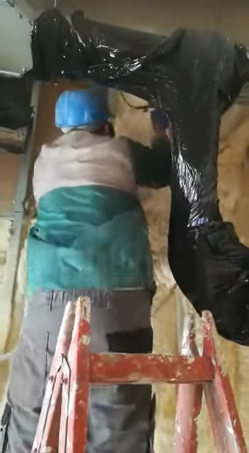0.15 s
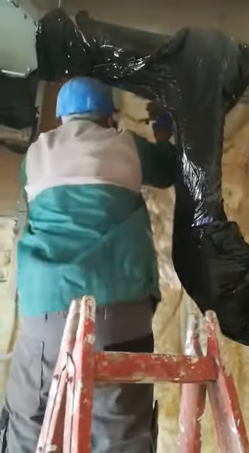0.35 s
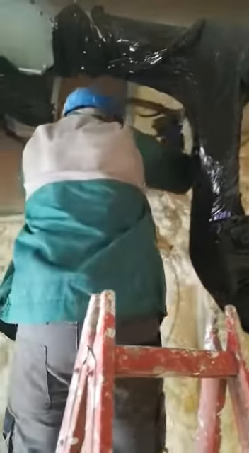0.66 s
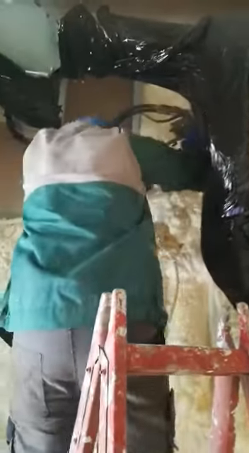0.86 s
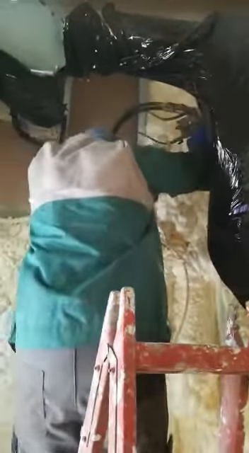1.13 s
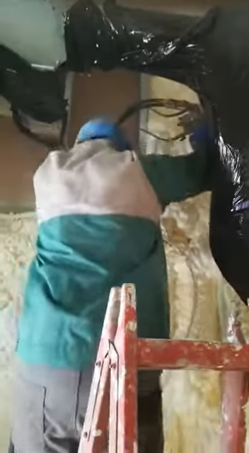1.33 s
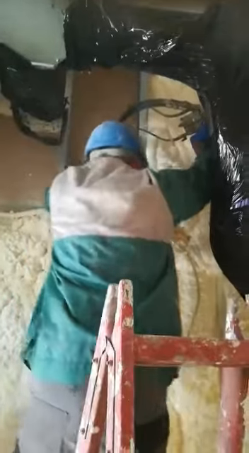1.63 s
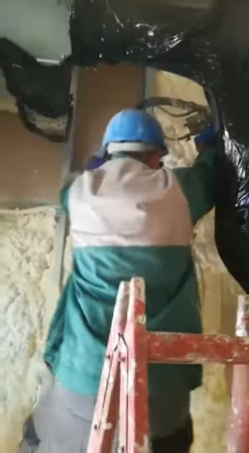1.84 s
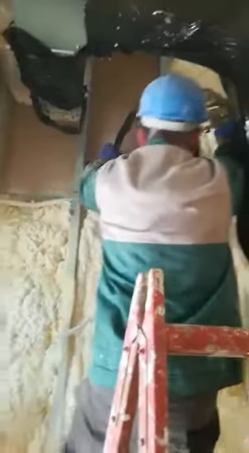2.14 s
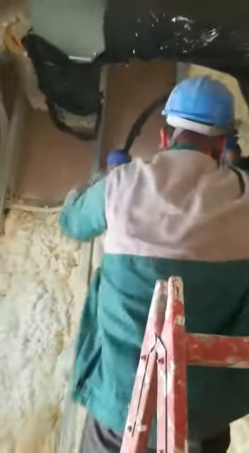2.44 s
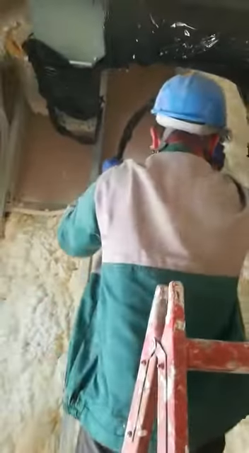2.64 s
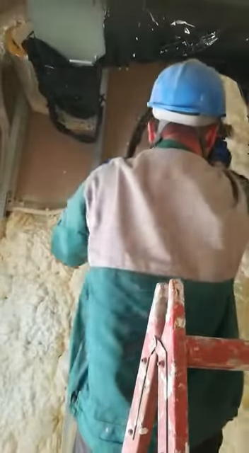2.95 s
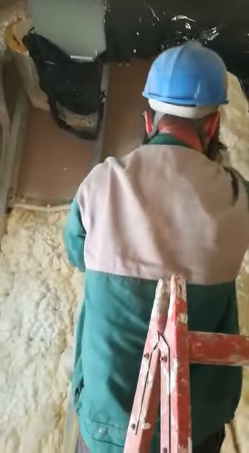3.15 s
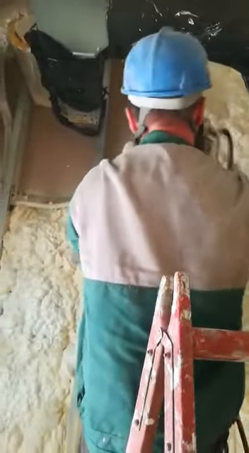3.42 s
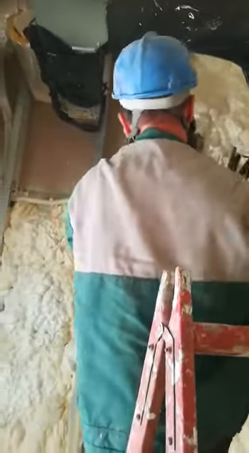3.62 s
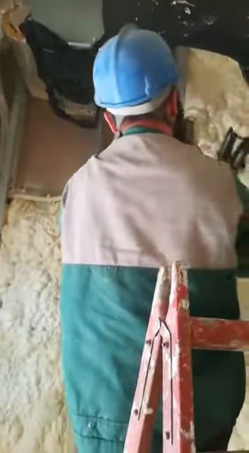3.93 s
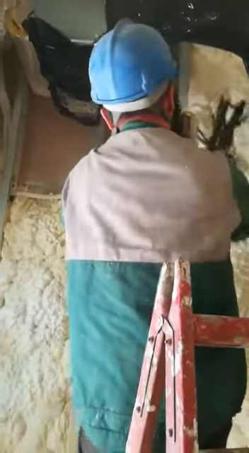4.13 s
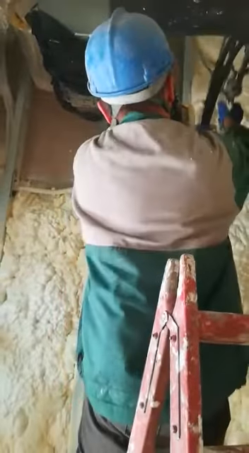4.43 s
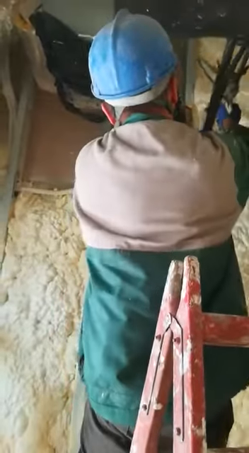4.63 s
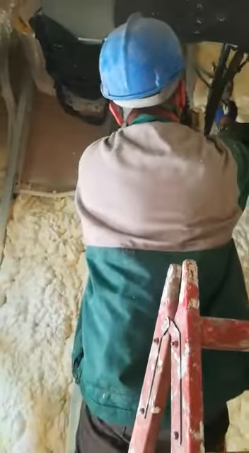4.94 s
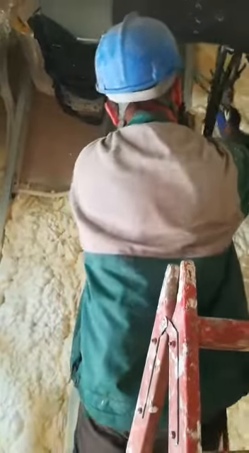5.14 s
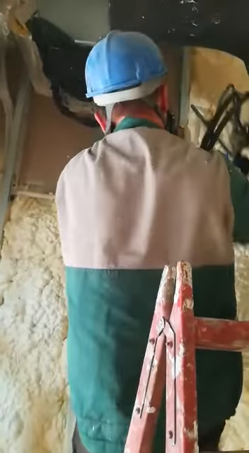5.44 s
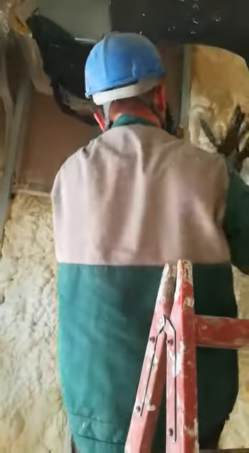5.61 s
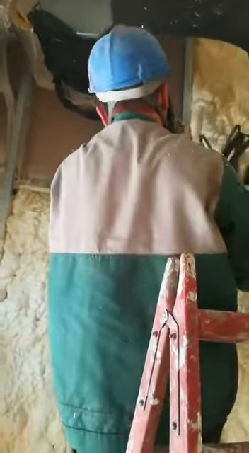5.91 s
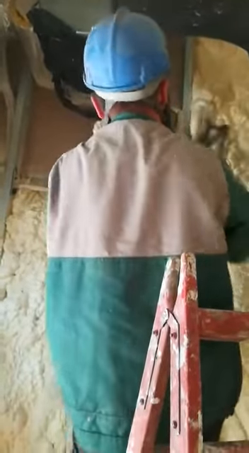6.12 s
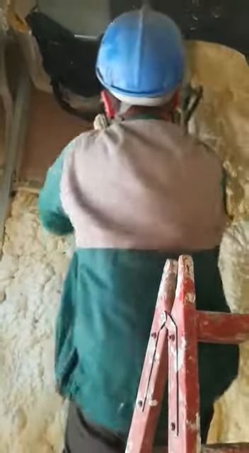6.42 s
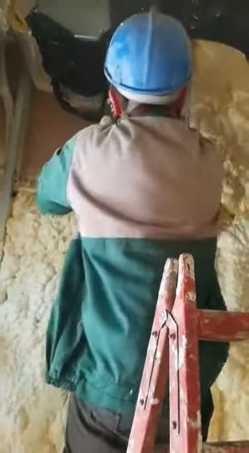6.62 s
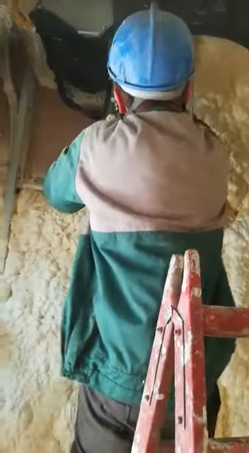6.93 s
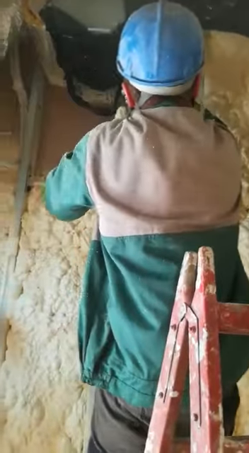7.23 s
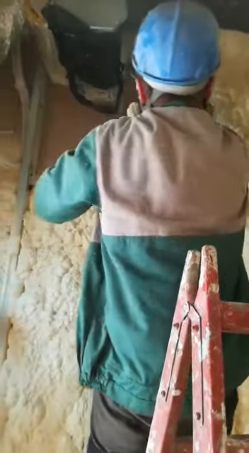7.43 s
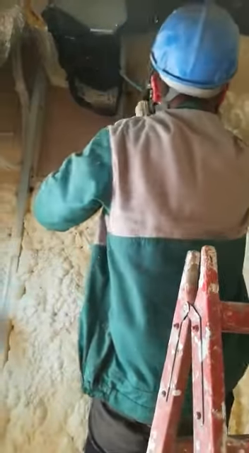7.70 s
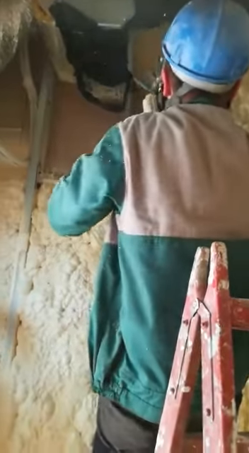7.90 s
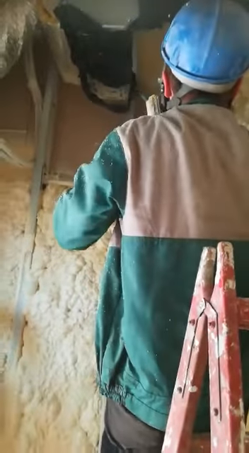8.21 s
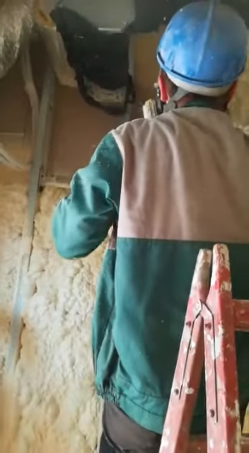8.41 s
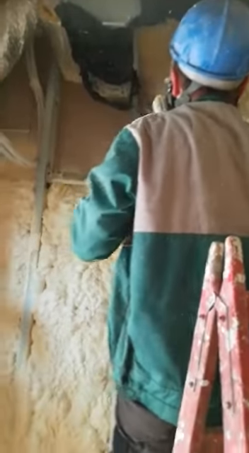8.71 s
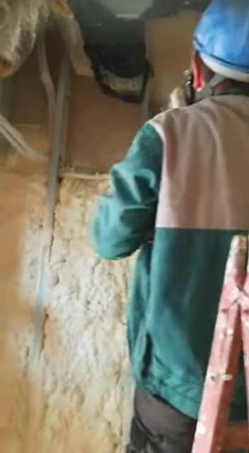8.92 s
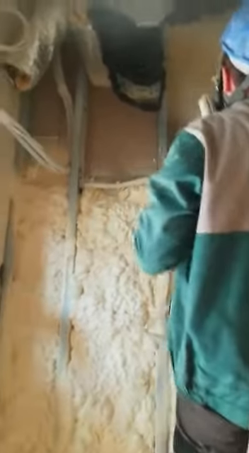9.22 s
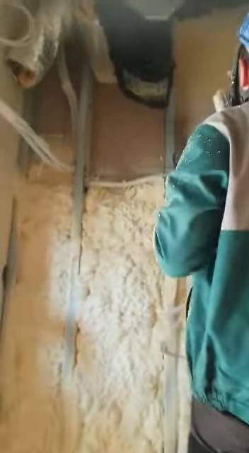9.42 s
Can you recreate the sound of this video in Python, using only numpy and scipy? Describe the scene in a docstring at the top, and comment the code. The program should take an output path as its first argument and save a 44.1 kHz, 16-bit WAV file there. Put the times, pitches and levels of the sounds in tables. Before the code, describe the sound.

Bright purge air hisses continuously from a nozzle. In the first seconds there are crackly hose scrapes, a short rubbery squeak, then scattered dull knocks and heavier boot scuffs. Then the spray bursts on, louder and breathier, roughest around six seconds, before settling into a long, slightly fluttering hiss. Low hum and rumble lie far beneath. Small padded space, phone microphones, treble stronger on the right.

```python
"""Spray foam gun in a padded attic

Purge air hisses from the nozzle as filtered noise; a trigger curve opens the stronger jet in bursts.
The spray roars into the wall cavity as resonant noise. Hose and boots scrape (tiny random slips), squeak
(gliding tones) and knock (decaying tones) over a soft rustle; a far pump hums below, with drone and rumble.
Two small microphones on a phone hear it, the left one turned away and dull in the treble."""
import sys
import numpy as np
from scipy import signal
from scipy.fft import rfft, irfft, next_fast_len
from scipy.io import wavfile

SR = 44100
rng = np.random.default_rng(int(sys.argv[2]) if len(sys.argv) > 2 else 0)


def pcm_store(signal):
    """Save signal as 16-bit PCM."""
    levels = np.round(np.clip(np.atleast_2d(signal), -1, 1) * 32767)
    wavfile.write(sys.argv[1], SR, levels.astype(np.int16).T)


def attenuation_scalar(level_db):
    """Turn a level in dB into a linear amplitude multiplier (20 dB per decade)."""
    decades = np.asarray(level_db, float) / 20
    return 10 ** decades


N = 421596   # length in samples
SIZE = next_fast_len(N)
HZ = np.maximum(np.arange(SIZE // 2 + 1) * SR / SIZE, 1)   # frequencies of a spectrum

# Ringing tones of the boards. Each row: frequency in Hz, relative strength in dB.
BOARD_TONES = [(120, -15), (195, -3), (245, -3), (325, -3.5), (455, -5.5), (560, -8)]
# The open jet as the gun sweeps. Each row: time in seconds, treble hiss in dB before tilt and surge,
# body of the hiss in dB against it before a fixed boost, upper and lower roar in dB before fixed cuts.
JET_SWEEP = [(4.5, -20.5, -12, -44, -53), (4.8, -23, -7.5, -46, -50.5), (5.05, -24, -9, -46, -54.5),
             (5.17, -23, -10, -43, -49.5), (5.23, -24.5, -13.5, -55, -61), (5.3, -26.5, -13.5, -57, -58),
             (5.36, -22.5, -8, -42.5, -53.5), (5.54, -22, -7, -45.5, -52), (5.8, -24.5, -5, -42.5, -42.5),
             (5.93, -24.5, -8, -42.5, -47), (6.03, -23, -5.5, -40, -43), (6.1, -26.5, -11, -54, -56),
             (6.2, -25.5, -16, -65, -63), (6.32, -23.5, -14, -61, -50.5), (6.5, -23.5, -13.5, -57, -62),
             (6.78, -22.5, -12.5, -51.5, -60), (6.97, -24.5, -11.5, -52.5, -57.5),
             (7.85, -23.5, -11, -51.5, -61.5), (8.3, -26.5, -9.5, -52, -60), (8.7, -26.5, -9, -51, -65),
             (8.9, -26, -8, -43.5, -57), (9.15, -25.5, -10, -48, -59.5), (9.56, -26.5, -8, -47, -62)]


def rms_one(x):
    """Scale to unit power."""
    return x / np.sqrt(np.mean(x ** 2) + 1e-20)


def in_time(rows):
    """Join the timed points of each column by straight lines, one value a sample."""
    s, *columns = np.transpose(rows)
    return [np.interp(np.arange(N) / SR, s, column) for column in columns]


def at_hz(points):
    """Read a frequency table at every frequency, on a logarithmic scale."""
    hz, values = np.transpose(points)
    return np.interp(np.log(HZ), np.log(hz), values)


def drift(rate):
    """Smooth random wandering of spread one; a higher rate in Hz wanders faster."""
    r = np.exp(-80 * np.pi * rate / SR)   # one step is 40 samples
    steps = rng.standard_normal(N // 40 + 2002)
    slow = signal.lfilter([1], [1, -2 * r, r * r], steps)[2000:]   # skip the settling
    return np.interp(np.arange(N) / 40, np.arange(len(slow)), rms_one(slow))


def resonance(x, hz, width):
    """Two-pole peak with gain one on top; width in Hz."""
    r = np.exp(-np.pi * width / SR)
    return signal.lfilter([(1 - r * r) / 2, 0, (r * r - 1) / 2],
                          [1, -2 * r * np.cos(2 * np.pi * hz / SR), r * r], x)


def ring(x, hz, width):
    """Pass through the same peak twice, for steeper sides."""
    return resonance(resonance(x, hz, width), hz, width)


def stroke(s, length, attack, t60):
    """Envelope: a straight rise, a hold until length has passed, then a decay of 60 dB in t60."""
    t = np.arange(N) / SR - s
    return np.clip(t / attack, 0, 1) * attenuation_scalar(-60 * np.clip(t - length, 0, None) / t60)


def at_ports(near, other):
    """Two spectra become left and right: sound off the walls is early on the left, straight sound late."""
    # Sound off the walls. Each row: frequency in Hz, likeness of left and right from 0 to 1.
    around = [(20, 1), (130, .98), (290, .78), (600, .4), (1200, .4), (1700, .2), (2300, .42), (3000, .12),
              (3500, .2), (4300, .05), (5000, .2), (6000, .05), (16000, 0)]
    # Sound straight from the gun. Each row: frequency in Hz, likeness from 0 to 1.
    straight = [(4000, 0.06), (6000, 0.17), (7000, 0.17), (8800, .3), (10500, .15), (16000, .08)]
    # The turned-away left microphone. Each row: frequency in Hz, left against right in dB.
    left_shade = [(60, -1.5), (330, -0.2), (650, 5), (1200, -1.5), (2700, 1.5), (4200, 0.5), (6000, -3),
                  (7300, -9), (8300, -15), (10000, -25), (13000, -19.5), (16000, -19.5)]
    lead_s, lag_s = 9.6 / 44100, 24 / 44100
    alike = at_hz(around) * np.exp(2j * np.pi * HZ * lead_s)
    alike = alike + at_hz(straight) * np.exp(-2j * np.pi * HZ * lag_s)
    left = alike * near + np.sqrt(np.clip(1 - abs(alike) ** 2, 0, 1)) * other
    shade = attenuation_scalar(at_hz(left_shade))
    # keep the average of the two ports at the level of the source
    middle = np.sqrt((1 + shade ** 2 + 2 * shade * alike.real) / 4)
    return np.array([shade * left, near]) / middle


def noise(spectrum):
    """Coloured noise at the two ports, as spectra."""
    return at_ports(*rfft(rng.standard_normal((2, SIZE)))) * attenuation_scalar(at_hz(spectrum))


def middle_rms(spectra, low_hz, high_hz):
    """Strength of the average of the two ports between two frequencies."""
    inside = (HZ > low_hz) & (HZ < high_hz)
    return np.sqrt(2 * np.sum(abs(spectra.mean(axis=0)[inside]) ** 2)) / SIZE


def band(spectra, low_hz, high_hz):
    """Turn spectra into sound with unit power of the middle between two frequencies."""
    return irfft(spectra, SIZE)[:, :N] / middle_rms(spectra, low_hz, high_hz)


def soft_rustle():
    """Soft mid-range rustling noise that rises with the scrapes."""
    # Each row: frequency in Hz, relative strength in dB per Hz.
    rustle_colour = [(150, -7.5), (260, -2.5), (656, -8), (750, -4), (867, -4.5), (1080, -2), (1260, -5.5),
                     (1420, -3), (1700, -3.5), (2600, -2), (3380, -26), (5720, -120)]
    # Each row: time in seconds, level in dB.
    rustle_level = [(0.0, -58), (0.43, -61.5), (0.6, -54), (1.0, -57), (2.95, -61.5), (3.31, -59.5),
                    (3.47, -55), (3.97, -58.5)]
    return attenuation_scalar(in_time(rustle_level)[0]) * band(noise(rustle_colour), 290, 2030)


def rumble():
    """Very low noise: a lumpy base, lifted by puffs of air on the microphones."""
    # Each row: frequency in Hz, relative strength in dB per Hz.
    low_air = [(12, -1), (24, 13.5), (36, 1.5), (52, -4), (75, -6.5), (95, -16), (140, -38)]
    # Each row: start in seconds, length in seconds, level in dB.
    puffs = [(0.0, 0.078, -38), (0.506, 0.052, -46.5), (0.93, 0.054, -45), (2.024, 0.28, -57),
             (4.35, 0.18, -60), (4.75, 0.26, -57), (5.546, 0.16, -62), (6.852, 0.13, -53),
             (8.192, 0.12, -52.5), (9.465, 0.08, -54)]
    level = attenuation_scalar(-65 + 3.0 * drift(5.4))
    for s, length, db in puffs:
        level = level + attenuation_scalar(db) * stroke(s, length, attack=0.019, t60=0.99)
    return level * band(noise(low_air), 14, 90)


def pump():
    """Narrow hum: noise squeezed through sharp resonances."""
    # Each row: frequency in Hz, width in Hz of each of two passes, strength in dB before the hum level.
    hums = [(108.96, 2.7, -8.5), (178.3, 23, -7.5)]
    return sum(attenuation_scalar(db) * rms_one(ring(rng.standard_normal(N), hz, width)) for hz, width, db in hums)


def site_hum():
    """The broad drone of the site and the pump, wavering together."""
    # Each row: frequency in Hz, relative strength in dB per Hz.
    site = [(56, -19), (95, -6), (113, 0), (140, -7.5), (220, -7.5), (300, -15), (390, -50), (660, -120)]
    # Each row: time in seconds, shared gain in dB around which the hum wavers.
    hum = [(0.0, -47), (0.15, -56.5), (2.4, -57.5), (3.2, -62), (4.2, -56), (6.6, -57.5), (7.2, -61),
           (9.56, -63)]
    both = attenuation_scalar(-2.0) * band(noise(site), 64, 340) + pump()
    return attenuation_scalar(in_time(hum)[0] + 3.0 * drift(3.0)) * both


def knocks():
    """Each blow strikes the board tones, and a shorter crack above them; all die away evenly in dB."""
    # Each row: start in seconds, strength in dB before a fixed cut, crack against thud in dB,
    # time in seconds for the thud to decay by 60 dB.
    blows = [(2.311, -42, -13, 0.066), (2.378, -58, -6, 0.09), (2.526, -50, 6, 0.07),
             (2.758, -42.5, -13, 0.061), (2.923, -47, -19, 0.092), (3.273, -36, -10, 0.13),
             (3.618, -30.5, -8, 0.086), (3.642, -42, -13, 0.1), (4.342, -40, -7, 0.081),
             (6.287, -40, -3, 0.11)]
    # Each row: frequency in Hz, relative strength in dB.
    crack_tones = [(660, 3), (780, 4), (950, -3), (1150, -7), (1800, -6)]
    out, t = np.zeros((2, N)), np.arange(SR // 2) / SR
    for s, strength_db, bright_db, t60 in blows:
        thud = crack = 0
        for hz, db in BOARD_TONES:
            level_db = db + 3.4 * rng.standard_normal((2, 1))   # chance for each port
            thud = thud + attenuation_scalar(level_db - 60 * t / t60) * np.sin(2 * np.pi * hz * t)
        for hz, db in crack_tones:
            level_db = db + 3 * rng.standard_normal((2, 1))
            phase = rng.uniform(0, 2 * np.pi, (2, 1))
            crack = crack + attenuation_scalar(level_db - 60 * t / (0.58 * t60)) * np.sin(2 * np.pi * hz * t + phase)
        onset = np.minimum(t / 0.0016, 1)
        at = round(s * SR)
        out[:, at:at + len(t)] += attenuation_scalar(strength_db - 5.5) * onset * (thud + attenuation_scalar(bright_db) * crack)
    return out


def squeaks(wobble_hz, overtone_db):
    """Rubber sticks and slips: the tone climbs as it grips, then sags; every other slip is weaker."""
    # Each row: start in seconds, length in seconds, starting pitch in Hz, climb in Hz before the sag,
    # strength in dB before the gains of the two ports.
    rubs = [(0.628, 0.033, 640, 25, -57), (0.838, 0.11, 597, 89, -50.5), (1.99, 0.012, 630, 50, -53)]
    climb_s, sag_hz_per_s = 0.036, 303
    out = 0
    for s, length, hz, climb_hz, db in rubs:
        t = np.clip(np.arange(N) / SR - s, 0, .5)
        pitch = hz + climb_hz * (1 - np.exp(-t / climb_s)) - sag_hz_per_s * t
        phase = 2 * np.pi * np.cumsum(pitch + wobble_hz * drift(35)) / SR
        uneven = sum(np.sin(k * phase / 2) for k in (3, 5, 6))   # multiples of half the pitch
        tone = np.sin(phase) + attenuation_scalar(overtone_db) * np.sin(2 * phase) + attenuation_scalar(-8) * uneven
        level = attenuation_scalar(db + 2.4 * drift(25))
        out = out + stroke(s, length, attack=0.011, t60=0.13) * level * tone
    return out * attenuation_scalar([[7.5], [0.4]])   # left, right gain in dB


def scrapes(per_s, grain_db):
    """Dense uneven slips ring the foil, the hollow hose and, more dully, the boards."""
    # Hose dragged over foil and frame. Each row: start in seconds, length in seconds,
    # rustle of the foil, hollow of the hose and weight of the boards, each in dB.
    drags = [(0.411, 0.051, -51.5, -53, -59), (0.494, 0.14, -50.5, -54, -71),
             (0.64, 0.026, -50, -43.5, -73), (0.775, 0.18, -47.5, -48.5, -71),
             (1.995, 0.02, -48, -50.5, -74), (2.053, 0.033, -61, -55, -77), (2.525, 0.008, -47, -48, -54),
             (3.27, 0.16, -57, -53, -52), (3.434, 0.16, -56, -53.5, -57.5), (3.607, 0.049, -61, -56, -41),
             (4.34, 0.22, -52.5, -58, -57.5)]
    # Foil, then hose. Each row: frequency in Hz, width in Hz of each of two passes,
    # strength in dB before dividing by the root of the width.
    foil = [(1400, 260, 1), (1810, 420, 2), (2540, 690, 0.5), (3100, 1400, 5), (4200, 1500, -4)]
    hose = [(684, 56, 0.5), (784, 136, 6), (883, 114, 3), (1068, 220, 7.5)]
    boards = [(hz, 0.15 * hz, db) for hz, db in BOARD_TONES]
    sizes = attenuation_scalar(grain_db * np.minimum(rng.exponential(1, (2, SIZE)), 4))
    sizes = sizes * rng.choice([-1, 1], (2, SIZE))
    slips = (rng.random((2, SIZE)) < per_s / SR) * sizes
    out = 0
    bodies = [(foil, 1300, 2700), (hose, 740, 1250), (boards, 200, 500)]
    for column, (tones, low_hz, high_hz) in enumerate(bodies):
        rung = sum(attenuation_scalar(db) * ring(slips, hz, width) / np.sqrt(width) for hz, width, db in tones)
        # the level swells over the first 28 % of each drag
        drag = sum(stroke(s, length, 0.28 * length, t60=0.24) * attenuation_scalar(db[column])
                   for s, length, *db in drags)
        sound = band(at_ports(*rfft(rung)), low_hz, high_hz)
        out = out + drag * attenuation_scalar(2 * drift(12.3)) * sound
    return out


def trigger():
    """Opening of the valve, 0 to 1, and the surge of pressure in dB that fades after each pull."""
    # Each row: starts to open in seconds, starts to shut in seconds, surge at opening in dB.
    pulls = [(4.514, 5.3, 2), (5.322, 5.554, 0.2), (5.608, 6.568, 3), (6.615, 9.7, 0.7)]
    open_s, shut_s, surge_s = 0.014, 0.022, 0.09
    t = np.arange(N) / SR
    opening = sum(np.interp(t, [s, s + open_s, end, end + shut_s], [0, 1, 1, 0]) for s, end, _ in pulls)
    surge_db = sum(db * (t > s) * np.exp(-abs(t - s) / surge_s) for s, _, db in pulls)
    return np.clip(opening, 0, 1), surge_db


def roar(edge_hz, patchy_db):
    """Droplets too dense to count: noise rings in the cavity, its upper and lower parts moving apart."""
    # Each row: frequency in Hz, relative strength in dB per Hz before the resonances.
    cavity = [(120, -40), (200, -6.5), (311, -2), (410, -7.5), (453, -6.5), (500, -9.5), (752, -3),
              (1260, -0.5), (2800, -1.5), (3640, -14), (6160, -120)]
    # Resonances. Each row: frequency in Hz, width in Hz, gain added to one (a factor).
    modes = [(461, 25, 1.24), (813, 16, 1.1), (1458, 9.3, 1.35)]
    opening, surge_db = trigger()
    _, _, upper_db, lower_db = in_time(JET_SWEEP)
    spectra = noise(cavity)
    spectra *= 1 + sum(gain / (1 + ((HZ - hz) * 2 / width) ** 2) for hz, width, gain in modes)
    low = 1 / (1 + (HZ / edge_hz) ** 6)   # share of the lower part
    upper = attenuation_scalar(upper_db - 6.0 + patchy_db * drift(9.9)) * band(spectra * (1 - low), 1224, 1634)
    lower = attenuation_scalar(lower_db - 2.5 + patchy_db * drift(30)) * band(spectra * low, 180, 1350)
    fade = np.exp(-1 / (0.043 * SR))   # the roar lingers, fading over 0.043 s
    filled = np.maximum(opening, signal.lfilter([1 - fade], [1, -fade], opening))
    return filled * attenuation_scalar(surge_db) * (upper + lower)


def nozzle(shared_db, own_db):
    """Turbulent hiss in overlapping bands; the flow flutters, each band flickers and wanders a little."""
    # Each row: frequency in Hz, relative strength in dB per Hz before the band gains.
    hiss = [(1100, -39.5), (1900, -37), (2300, -29.5), (2780, -17.5), (3000, -12), (3800, -9), (5100, -7.5),
            (6400, -8), (8100, -6), (9300, -4), (10500, -3), (12500, -2.5), (14300, 1.5), (15700, 2)]
    # Purge air with the trigger shut. Each row: time in seconds, treble hiss in dB before the tilt,
    # body of the hiss in dB against it before a fixed boost.
    purge = [(0, -28.5, -17), (0.6, -28.5, -15.5), (1.05, -30.5, -14), (1.75, -30, -14),
             (2.05, -28.5, -15.5), (2.3, -30, -14.5), (2.95, -29.5, -16.5), (3.3, -31, -13),
             (3.65, -32.5, -12.5), (4.0, -31, -14), (4.3, -30.5, -12.5), (4.42, -28, -12.5),
             (5.3, -30.5, -13), (5.6, -30.5, -8), (6.6, -28, -13)]
    # The jet sputters, unevenly from band to band. Each row: time in seconds, factor on the flicker.
    sputters = [(6.0, 1.1), (6.15, 2.3), (6.85, 1.6), (7.1, 1.1)]
    opening, surge_db = trigger()
    purge_treble, purge_body = in_time(purge)
    jet_treble, jet_body, _, _ = in_time(JET_SWEEP)
    treble_db = (1 - opening) * purge_treble + opening * jet_treble + surge_db
    body_db = (1 - opening) * purge_body + opening * jet_body
    sputter, = in_time(sputters)
    spectra, out = noise(hiss), 0
    spectra /= middle_rms(spectra, 9000, 15500)
    flutter = shared_db * (drift(6.2) + .5 * drift(50))   # the same in all bands
    centres = np.geomspace(2000, 16000, num=11)
    for k, hz in enumerate(centres):
        share = np.interp(np.log(HZ), np.log(centres), np.arange(len(centres)) == k)
        lowness = 1 / (1 + (hz / 6100) ** 4)   # the body control moves the lower bands
        tilt = np.clip(np.log2(hz / 12500) * 8.9, -2.5, 1) * (1 - lowness)   # the treble is tipped
        flicker = own_db * (sputter * drift(13.7) + 0.87 * drift(1.0))
        gain_db = treble_db + lowness * (body_db + 9.5) + tilt * 0.57 + flutter + flicker
        out = out + attenuation_scalar(gain_db) * irfft(spectra * share, SIZE)[:, :N]
    return out


def scene():
    """All sources at the two ports, from the background to the gun."""
    background = soft_rustle() + rumble() + site_hum()
    handling = knocks() + squeaks(wobble_hz=4.7, overtone_db=-7) + scrapes(per_s=4000, grain_db=1.0)
    gun = roar(edge_hz=840, patchy_db=1.98) + nozzle(shared_db=0.18, own_db=0.73)
    return background + handling + gun


def band_limit(x):
    """A steep low-pass at the top of the band."""
    return signal.sosfilt(signal.butter(12, 17080, fs=SR, output="sos"), x)


def record(dry):
    """The top is cut steeply above 15740 Hz to finish the mix."""
    steep = signal.ellip(14, .5, 75, 15740, fs=SR, output="sos")
    mix = signal.sosfilt(steep, dry)
    return band_limit(mix)


dry = scene()
out = record(dry)
pcm_store(out)
```